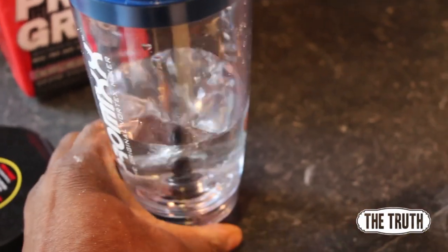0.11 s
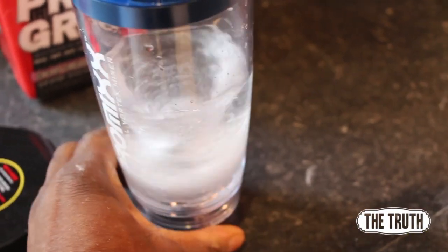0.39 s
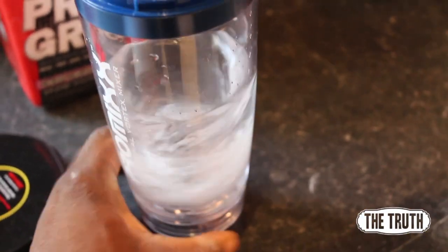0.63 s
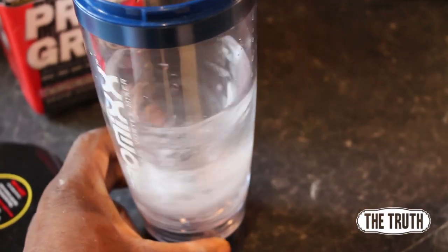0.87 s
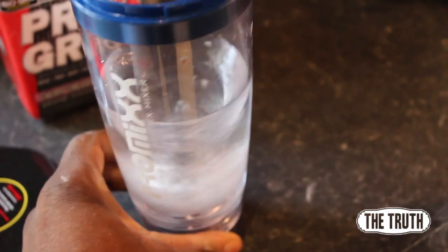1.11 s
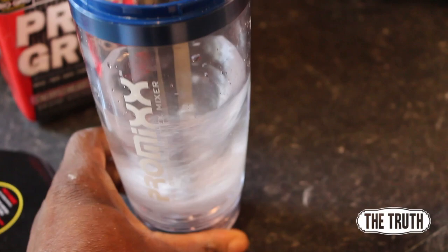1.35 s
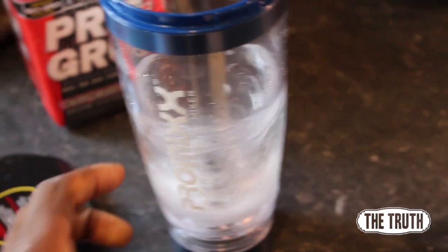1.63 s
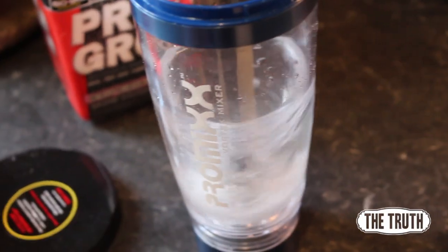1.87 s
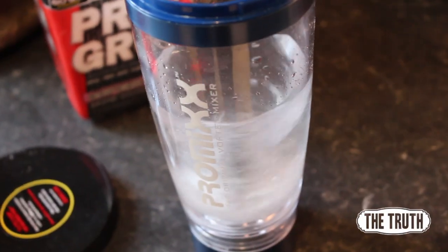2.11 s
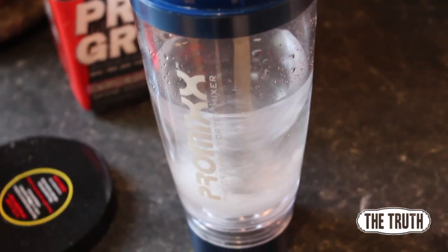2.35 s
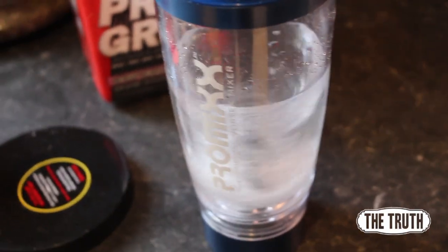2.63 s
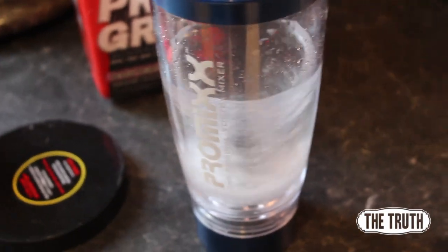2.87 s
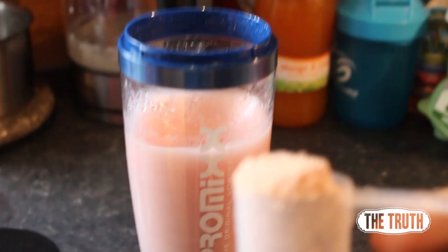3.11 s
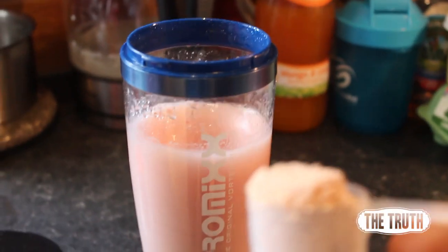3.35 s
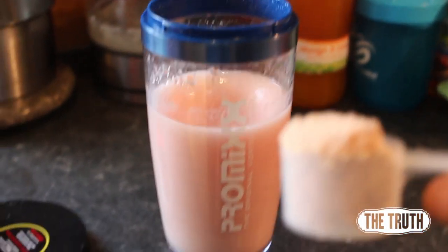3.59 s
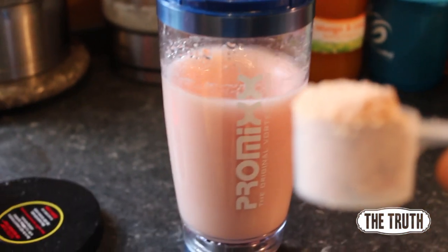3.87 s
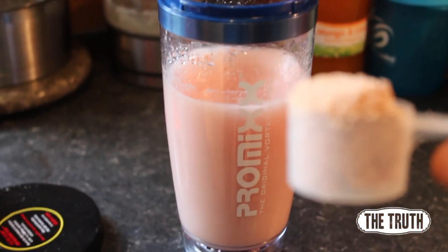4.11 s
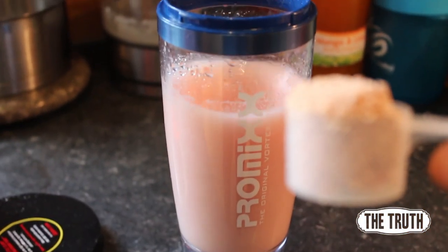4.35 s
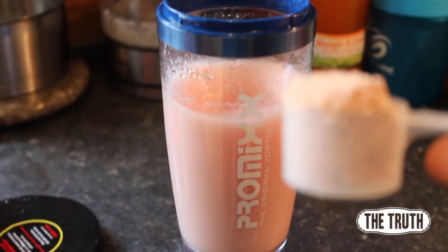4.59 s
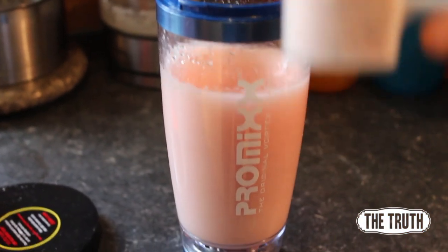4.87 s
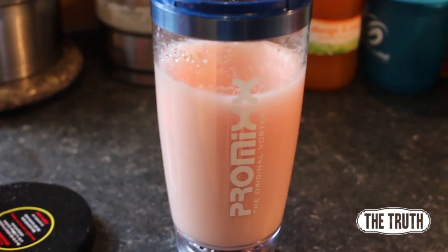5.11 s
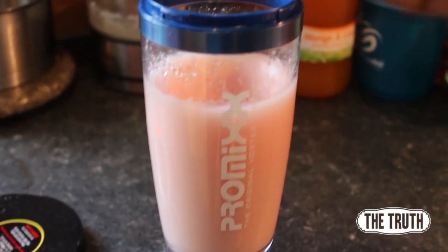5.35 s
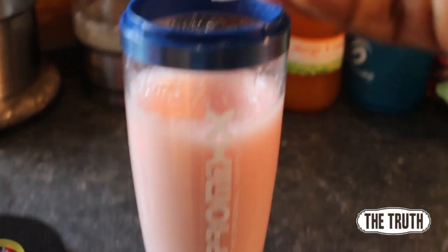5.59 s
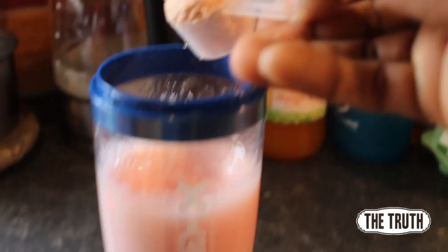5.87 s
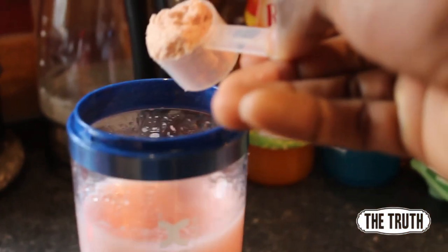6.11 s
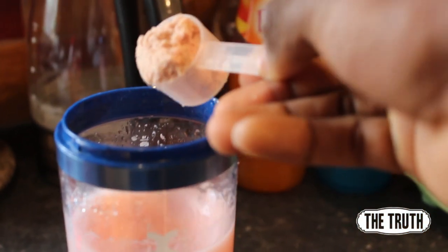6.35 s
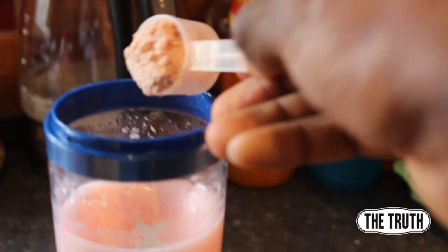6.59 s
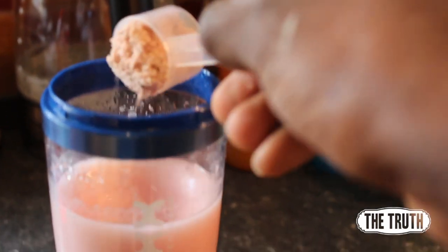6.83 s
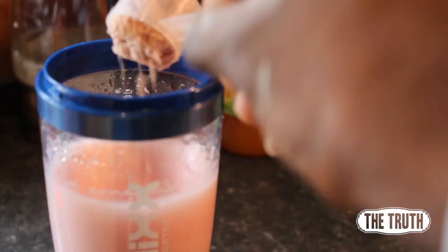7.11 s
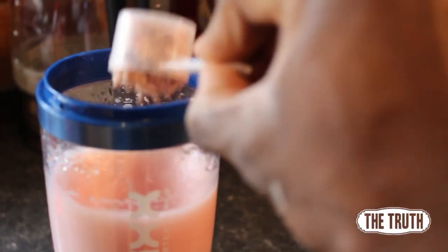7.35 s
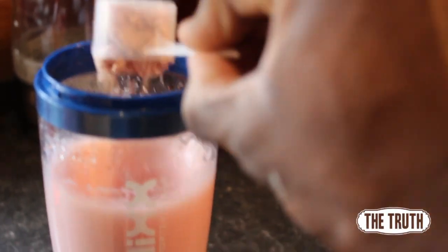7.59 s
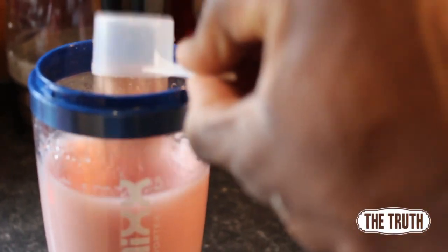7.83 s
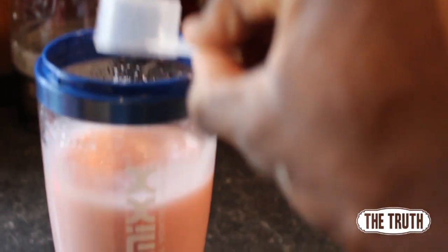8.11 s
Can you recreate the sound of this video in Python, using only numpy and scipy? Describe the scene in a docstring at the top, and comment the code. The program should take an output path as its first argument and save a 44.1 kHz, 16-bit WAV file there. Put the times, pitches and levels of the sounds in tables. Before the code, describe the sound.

A switch ticks and a battery mixer churns water in a plastic cup with a fizzing, gurgling roar, pauses briefly, then drones lower through thick drink.

```python
"""A thumb ticks a battery mixer on, and it churns water in a tall plastic cup with a fizzing roar.
Random bubble snaps and hiss ring the cup's modes; a resonant band slides up as a whirlpool forms.
Decaying tones make the gulps, noise bursts the splashes, and phase-scrambled fizz a wide treble hiss.
After a short silence a thick drink drones lower, its colour shifting as powder is tipped in.
Coloured noise makes the rumble and room tone; random taps make the kitchen echoes."""
import sys
import numpy as np
from scipy import signal
from scipy.fft import rfft, irfft
from scipy.io import wavfile
from scipy.ndimage import uniform_filter1d

SR = 44100
rng = np.random.default_rng(int(sys.argv[2]) if len(sys.argv) > 2 else 0)


def to_wav(sig):
    """Store sig (one row per channel, or 1-D mono) as 16-bit WAV at the path in sys.argv[1].

    Samples outside -1..1 are clipped; the rate is SR.
    """
    pcm = np.clip(np.atleast_2d(sig), -1, 1) * 32767
    pcm = np.round(pcm).astype(np.int16)
    wavfile.write(sys.argv[1], SR, pcm.T)  # frames by channels


def gain_from_decibels(decibels):
    """Convert decibel values to linear amplitude factors."""
    exponent = np.asarray(decibels, float) / 20
    return 10 ** exponent


N = 362502
TIME_S = np.arange(N) / SR

# Runs of the mixer. Each row: start in seconds, stop in seconds, churn gain in dB,
# extra fizz gain in dB, rumble gain in dB.
RUNS = [(.226, 3.077, -20, 0, -68.5), (3.157, 8.22, -18, -1.5, -60)]
FIRST_START_S, FIRST_STOP_S = RUNS[0][:2]
SECOND_START_S = RUNS[1][0]
SECOND_RUN = TIME_S > FIRST_STOP_S
WHIRL_START_S, WHIRL_FULL_S = 0.52, 1.35  # the whirlpool deepens evenly between these


def mixer():
    """The blade tears air into bubbles whose snaps excite the cup; returns churn body and fizz."""
    fizz_hz = 3580
    drive = snaps()
    churn = patchy(cup(drive) + rising_band(drive))
    body = signal.sosfilt(signal.butter(1, fizz_hz, fs=SR, output="sos"), churn)
    fizz = fizz_gain() * (churn - body)
    return churn_gain() * np.array([body, fizz])


def snaps():
    """Dense bubble snaps, a few of them large, over turbulent hiss."""
    snaps_per_s, snap_spread_db, hiss_db = 2500, 3.5, -1
    outward_share = 0.6  # snaps that push the wall outward first
    chance, side = rng.random(N), rng.random(N)
    size, hiss = rng.exponential(1, N), rng.standard_normal(N)
    pops = np.sign(outward_share - side) * gain_from_decibels(snap_spread_db * np.minimum(size, 4))
    pops *= chance < snaps_per_s / SR
    return evened(evened(pops - pops.mean()) + gain_from_decibels(hiss_db) * hiss)


def cup(drive):
    """Snaps ring the cup as the liquid passes from level to whirlpool, then thick to powdered."""
    # Modes for level water, a deep whirlpool and the thick drink.
    # Each row: centre in Hz, width at half amplitude in Hz, level in dB.
    level_modes = [(637, 63, -1), (775, 94, 0), (966, 66, -6.5), (1420, 170, -20), (1874, 65, -15.5),
                   (2370, 150, -17), (2750, 290, -18.5), (3500, 45, -14.5)]
    deep_modes = [(220, 36, -27.5), (653.7, 27.4, -3.5), (770, 41, -8), (1069, 77, -4.5), (1140, 40, -4),
                  (1244, 68, -6.5), (1424, 82, -2), (1510, 39, -2), (2310, 31, -18), (2570, 93, -9.5),
                  (2835, 150, -10.5), (3470, 51, -16.5), (4520, 180, -23), (5075, 150, -19.5)]
    thick_modes = [(208.3, 18, -19), (349, 24, 0.5), (375.6, 26, 0), (438, 14, -10), (570, 61, -7.5),
                   (636, 24, -7.5), (732.6, 77, 0), (787.5, 33, -4.5), (1064, 134, -6), (1192, 88, -9.5),
                   (1423, 144, -14), (2252, 146, -15.5), (2380, 46, -16), (2522, 38, -16),
                   (3080, 55, -21.5), (3464, 17, -17), (3750, 49, -22), (4120, 63, -22.5),
                   (4440, 77, -26.5), (4674, 45, -20.5), (5280, 51, -23), (5420, 56, -30)]
    # Broad colour between the modes, the last once powder has thickened the drink further.
    # Each row: frequency in Hz, level in dB on the scale of the modes.
    level_wash = [(30, -73), (150, -36.5), (450, -27), (600, -41), (900, -24), (1800, -20), (4000, -23.5),
                  (7000, -28), (10000, -32), (13000, -41), (16000, -44)]
    deep_wash = [(30, -73), (150, -32), (500, -35.5), (600, -10.5), (900, -16), (1600, -12), (2000, -19),
                 (4000, -21), (7000, -23), (9500, -20.5), (12000, -26.5), (14000, -31), (16000, -34)]
    thick_wash = [(30, -73), (120, -49), (280, -17), (480, -31), (900, -25), (1600, -17.5), (2100, -21),
                  (2700, -22.5), (5000, -27.5), (7000, -30.5), (9500, -28), (12000, -36.5), (13500, -39.5),
                  (16000, -42)]
    powdered_wash = [(30, -75), (120, -56), (280, -17), (480, -25), (900, -23), (1600, -20), (2100, -23),
                     (2700, -26.5), (5000, -31.5), (6300, -29.5), (7500, -33), (9500, -32), (12000, -37),
                     (13500, -44), (16000, -41)]
    powder_start_s, powder_full_s = 4.4, 7.26
    states = [(level_modes, level_wash), (deep_modes, deep_wash),
              (thick_modes, thick_wash), (thick_modes, powdered_wash)]
    deep = ramp(WHIRL_START_S, WHIRL_FULL_S)
    powder = ramp(powder_start_s, powder_full_s)
    power_shares = [(1 - deep) * ~SECOND_RUN, deep * ~SECOND_RUN,
                    (1 - powder) * SECOND_RUN, powder * SECOND_RUN]
    out = np.zeros(N)
    for k, ((modes, wash), share) in enumerate(zip(states, power_shares)):
        own_drive = np.roll(drive, k * SR)  # unlike snaps, so powers add in the crossfade
        out += np.sqrt(share) * signal.oaconvolve(own_drive, cup_ring(modes, wash))[:N]
    return out


def cup_ring(modes, wash):
    """Minimum-phase response to one snap: steep peaks over a wash, starting at once and dying away."""
    hz = abs(np.fft.fftfreq(2 ** 14, 1 / SR))
    power = gain_from_decibels(2 * read(wash, hz))
    for mode_hz, width_hz, db in modes:
        power += gain_from_decibels(2 * db) / (1 + (2 * (hz - mode_hz) / width_hz) ** 2) ** 2
    log_gain = np.log(power) / 2
    response = np.fft.ifft(np.exp(np.conj(signal.hilbert(log_gain)))).real
    return evened(response[:2 ** 12]) / 2 ** 6  # unit energy


def rising_band(drive):
    """A resonant band slides upward as the whirlpool forms, swelling and then fading."""
    start_hz, rise_hz_per_s, width_hz = 734, 470, 220  # width of each of two passes
    top_s, top_db, fall_db_per_s = 1.03, -4, 26
    hz = start_hz + rise_hz_per_s * np.maximum(TIME_S - WHIRL_START_S, 0)
    once = resonate(drive[::-1], hz, width_hz)  # reversed: unlike the cup's drive
    band = evened(resonate(once, hz, width_hz))
    return gain_from_decibels(top_db - fall_db_per_s * abs(TIME_S - top_s)) * band * ~SECOND_RUN


def resonate(x, hz, width_hz):
    """Moving resonance: shifts the curve hz down to zero, smooths, and shifts back."""
    turn = np.exp(2j * np.pi * np.cumsum(hz) / SR)
    r = np.exp(-np.pi * width_hz / SR)
    return 2 * (turn * signal.lfilter([1 - r], [1, -r], x / turn)).real


def patchy(x):
    """The swirling surface makes bands a few hundred Hz wide swell and fade on their own."""
    patch_db = 1.5
    steady_hz = 900  # the long waves below this feel the whole cup, so they wander less
    hz, _, z = signal.stft(x, SR, nperseg=512, noverlap=384)
    patches = evened(uniform_filter1d(wobble(z.shape, short=8, long=100), size=5, axis=0))
    depth_db = patch_db * hz ** 2 / (hz ** 2 + steady_hz ** 2)
    z = z * gain_from_decibels(depth_db[:, None] * patches)
    return signal.istft(z, nperseg=512, noverlap=384)[1][:N]


def fizz_gain():
    """Clear water fizzes less until the first bubbles spread; the swirling surface makes fizz flicker."""
    clear_db, foamy_s, flicker_db = 15, 0.35, 0.58
    db = per_run(column=3) - clear_db * (1 - ramp(FIRST_START_S, foamy_s))
    return gain_from_decibels(db + flicker_db * wobble(N, short=900, long=14000))


def churn_gain():
    """From rest the blade bites hard into still water, then settles; brief swells and dips follow."""
    # Each row: time in seconds, change in dB, half length in seconds (to 1/e of the change).
    lurches = [(0.482, 3, 0.018), (0.63, 3.5, 0.04), (8.071, -7.5, 0.029), (8.17, 2, 0.06)]
    spin_up_s, kick_db, settle_s = 0.014, 4.5, 0.22
    since_s = np.maximum(TIME_S - FIRST_START_S, 0)
    db = per_run(column=2) + kick_db * np.exp(-since_s / settle_s)
    for s, step_db, half_s in lurches:
        db += step_db * np.exp(-((TIME_S - s) / half_s) ** 2)
    return gain_from_decibels(db) * (1 - np.exp(-(since_s / spin_up_s) ** 2))


def gulps():
    """Bubbles ring a few cycles, rising a little near the surface; small ones gurgle in the whirlpool."""
    # Largest bubbles gulped at the blade. Each row: start in seconds, level in dB, starting pitch in Hz.
    large = [(0.474, -8, 778), (0.548, -8, 775), (1.654, -9, 1220), (1.725, -3, 1430), (1.844, -9, 1380),
             (1.934, -10, 1470), (2.086, -3, 1430), (2.158, -1, 1330), (2.985, -3, 1370), (4.379, -6, 1070),
             (7.455, -5.5, 720), (7.566, -5, 732)]
    ring_q, attack_s, rise_per_s = 11.5, 0.001, 1.3
    gurgles_per_s, gurgle_db, spread_db, low_hz, high_hz = 25, -9, 8, 903, 1600
    span_s = FIRST_STOP_S - WHIRL_START_S
    when, size, pitch = rng.random((int(gurgles_per_s * span_s), 3)).T
    small = zip(WHIRL_START_S + when * span_s, gurgle_db - spread_db * size,
                low_hz * (high_hz / low_hz) ** pitch)
    out, t = np.zeros(N), np.arange(2000) / SR
    for s, db, hz in [*large, *small]:
        fade = np.exp(-np.pi * hz * t / ring_q) * (1 - np.exp(-t / attack_s))
        add(out, s, gain_from_decibels(db) * fade * np.sin(2 * np.pi * hz * t * (1 + rise_per_s * t)))
    return out


def splashes():
    """Water thrown against the wall: short untuned noise bursts with a quick rise."""
    # Each row: start in seconds, level in dB, t60 in seconds.
    bursts = [(.233, -6.5, 0.039), (0.247, -4.5, 0.028), (0.281, -15, 0.03), (0.327, -15.5, 0.11),
              (.39, -12.5, 0.072), (.428, -21, 0.05), (0.439, -14.5, 0.044), (8.146, -21, 0.092)]
    # Each row: frequency in Hz, relative level in dB.
    colour = [(300, -11), (1200, -4), (2000, 3), (3500, -3), (5300, -4), (6500, -14), (9000, -10.5),
              (16000, -35)]
    rise_s = 0.0017
    out, t = np.zeros(N), np.arange(6000) / SR
    for (s, db, t60_s), noise in zip(bursts, rng.standard_normal((len(bursts), 6000))):
        envelope = gain_from_decibels(db - 60 * t / t60_s) * (1 - np.exp(-t / rise_s))
        add(out, s, envelope * evened(filtered(noise, colour)))
    return out


def wide_fizz(fizz):
    """Treble hiss that follows the fizz's level, with random phases in each channel."""
    # Each row: frequency in Hz, gain in dB.
    colour = [(3000, -39), (6000, -5), (9000, 1.5), (12000, 0), (16000, -5)]
    wide_db = -6.5  # applied on top of the colour
    z = signal.stft(fizz, nperseg=256)[2]
    scrambled = abs(z) * np.exp(2j * np.pi * rng.random((2, *z.shape)))
    return gain_from_decibels(wide_db) * filtered(signal.istft(scrambled, nperseg=256)[1][:, :N], colour)


def button():
    """The plastic base ticks under the thumb: short modes excited by a scrape of a few ms."""
    # Each row: start in seconds, peak in dB.
    presses = [(0.118, -30), (0.226, -19)]
    # Each row: frequency in Hz, relative level in dB, t60 in seconds.
    modes = [(2000, -17, .012), (2730, -2, .03), (3700, -1, .012), (5530, -3, .01), (6600, -2, .01),
             (9000, 0, .003), (12500, -4, .002)]
    out, t = np.zeros(N), np.arange(4000) / SR
    ring = sum(gain_from_decibels(db - 60 * t / t60_s) * np.sin(2 * np.pi * hz * t) for hz, db, t60_s in modes)
    for (s, db), scrape in zip(presses, rng.standard_normal((len(presses), 256))):
        tick = np.convolve(ring, scrape)
        add(out, s, gain_from_decibels(db) * tick / abs(tick).max())
    return out


def echoes(x):
    """Counter and walls: sparse decaying taps of random sign, different at each microphone."""
    # Each row: frequency in Hz, level against the direct sound in dB.
    colour = [(100, -10), (350, -21), (700, -17), (1400, -10.5), (3000, -7), (6000, -4.5), (9000, -6),
              (12000, -3.5)]
    t60_s, length, spacing = 0.2, SR // 2, 20
    slots = np.arange(40, length - spacing, spacing)
    shape = 2, len(slots)
    taps = np.zeros((2, length))
    signs = rng.choice([-1., 1.], shape)
    np.put_along_axis(taps, slots + rng.integers(0, spacing, shape), signs, 1)
    taps *= gain_from_decibels(-60 * np.arange(length) / SR / t60_s)
    taps /= np.linalg.norm(taps[0])
    return filtered(signal.fftconvolve(x[None], taps, axes=1)[:, :N], colour)


def rumble():
    """Low noise, partly alike at both microphones, wanders and swells with dull bumps via the counter."""
    # Each row: time in seconds, added gain in dB.
    bumps = [(.235, -48), (1.29, -47), (2.34, -64), (2.65, -51), (3.16, -49), (5.92, -53), (6.64, -52),
             (8.08, -48)]
    # Each row: frequency in Hz, relative level in dB.
    colour = [(20, -23), (40, 3), (80, -6), (130, 6.5), (200, -26), (400, -47), (16000, -90)]
    rise_s, fade_s, wander_db = 0.034, 0.061, 4.0
    shared, own = rng.standard_normal(N), rng.standard_normal((2, N))
    level = gain_from_decibels(per_run(column=4) + wander_db * wobble(N, short=4000, long=40000))
    for s, db in bumps:
        level += gain_from_decibels(db) * np.exp(-abs(TIME_S - s) / np.where(TIME_S < s, rise_s, fade_s))
    return level * evened(filtered(shared + 0.37 * own, colour))


def kitchen():
    """Noise partly shared by both microphones, with a faint steady whine; cut quickly between the runs."""
    # Each row: frequency in Hz, relative level in dB per Hz.
    colour = [(20, -43), (64, -9), (100, -24), (384, -6), (560, -21), (780, -7), (950, -20), (1800, -9),
              (2300, -12), (2750, -8.5), (3050, -10), (3900, -10), (4600, -15.5), (9000, -21.5),
              (12500, -29), (16000, -38)]
    room_db, cut_t60_s = -45.5, 0.009
    whine_hz, whine_db = 2740, -13  # against the room tone
    shared, own = rng.standard_normal(N), rng.standard_normal((2, N))
    cut_db = -60 * np.maximum(TIME_S - FIRST_STOP_S, 0) / cut_t60_s * (TIME_S < SECOND_START_S)
    whine = gain_from_decibels(whine_db) * np.sin(2 * np.pi * whine_hz * TIME_S)
    return gain_from_decibels(room_db + cut_db) * (evened(filtered(shared + 0.5 * own, colour)) + whine)


def evened(x):
    """Scales to rms 1."""
    return x / np.sqrt(np.mean(x ** 2) + 1e-20)


def read(points, hz):
    """Reads a spectrum table on a log-frequency axis."""
    f, value = np.transpose(points)
    return np.interp(np.log(hz + 1), np.log(f + 1), value)


def filtered(x, points):
    """Colours a sound by a spectrum table."""
    n = x.shape[-1]
    return irfft(rfft(x) * gain_from_decibels(read(points, np.fft.rfftfreq(n, 1 / SR))), n)


def add(mix, s, sound):
    """Places a sound at s seconds."""
    part = mix[round(s * SR):][:len(sound)]
    part += sound[:len(part)]


def wobble(shape, short, long):
    """Chance that wanders along the last axis on time scales between short and long steps."""
    x = uniform_filter1d(uniform_filter1d(rng.standard_normal(shape), size=short), size=short)
    return evened(x - uniform_filter1d(x, size=long))


def ramp(start_s, full_s):
    """Climbs evenly from 0 to 1 between two times."""
    return np.clip((TIME_S - start_s) / (full_s - start_s), 0, 1)


def per_run(column):
    """One column of the runs, switched where the first run stops."""
    return np.where(SECOND_RUN, RUNS[1][column], RUNS[0][column])


def scene():
    """The mixer sounds only in its two runs, cut off sharply between them, over the room tone."""
    left_db, fade_in_s = 0.07, 0.0013
    running = sum(np.clip((TIME_S - run[0]) / fade_in_s, 0, 1) * (TIME_S <= run[1]) for run in RUNS)
    heard = (TIME_S <= FIRST_STOP_S) | (TIME_S > SECOND_START_S)
    body, fizz = mixer()
    near = (body + fizz) * running + gulps() + splashes() + button()
    direct = near * gain_from_decibels([[left_db], [-left_db]])
    spread = (rumble() + wide_fizz(fizz)) * running
    return (direct + echoes(near)) * heard + spread + kitchen()


def band_limit(x):
    """A steep low-pass at the top of the band."""
    return signal.sosfilt(signal.butter(12, 16680, fs=SR, output="sos"), x)


def record(dry):
    """A small microphone loses the deepest bass; a sharp low-pass limits the treble."""
    bass_hz, edge_hz = 69.5, 15750
    thin = signal.sosfilt(signal.butter(2, bass_hz, "highpass", fs=SR, output="sos"), dry)
    lowpass = signal.firwin(511, edge_hz, window=("kaiser", 9), fs=SR)
    limited = signal.oaconvolve(thin, lowpass[None], "same", axes=1)
    return band_limit(limited)


dry = scene()
out = record(dry)
to_wav(out)
```